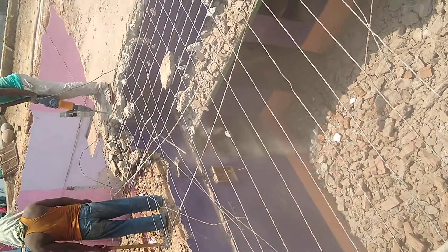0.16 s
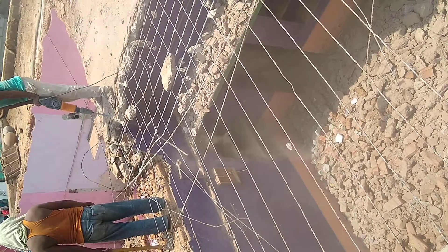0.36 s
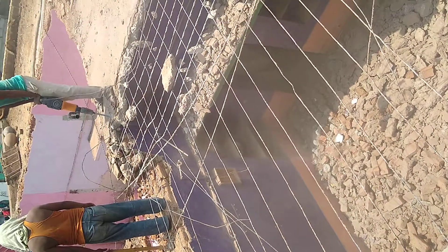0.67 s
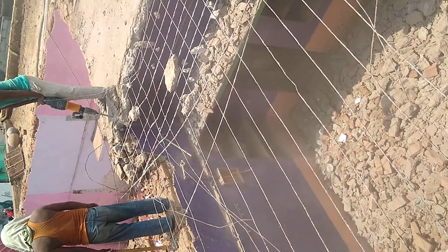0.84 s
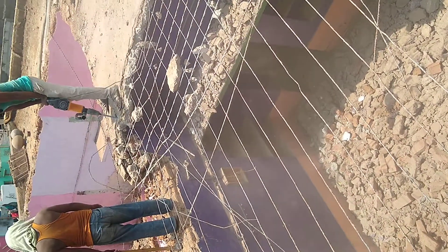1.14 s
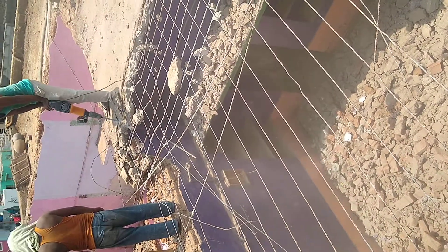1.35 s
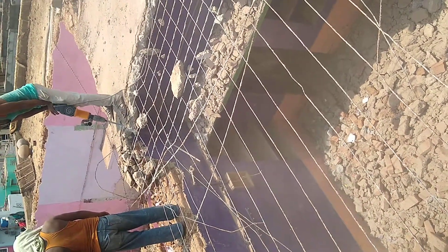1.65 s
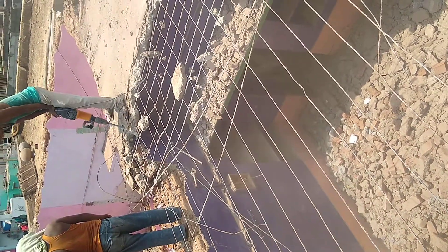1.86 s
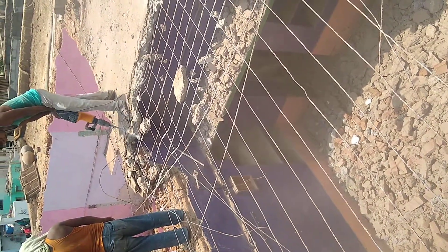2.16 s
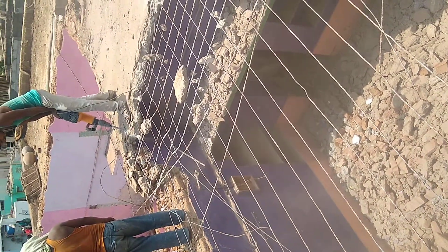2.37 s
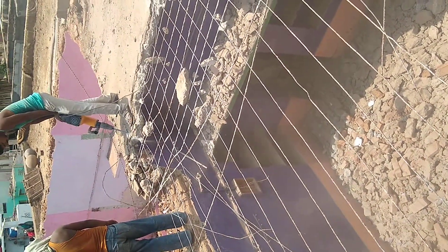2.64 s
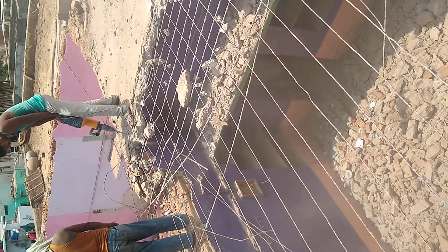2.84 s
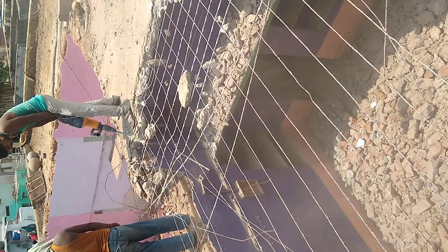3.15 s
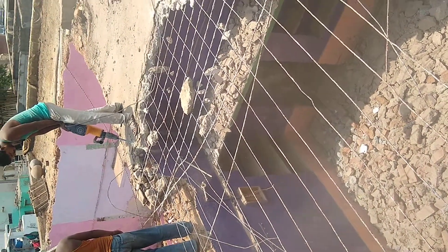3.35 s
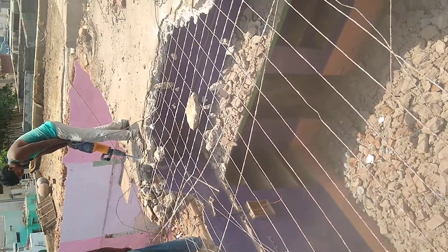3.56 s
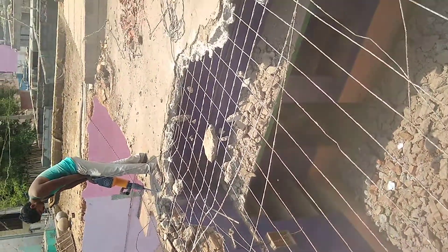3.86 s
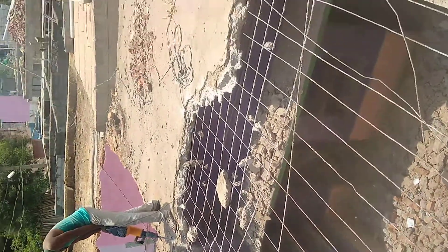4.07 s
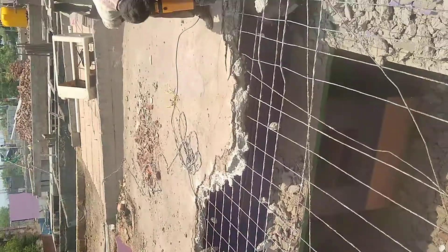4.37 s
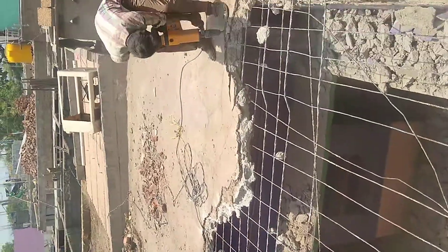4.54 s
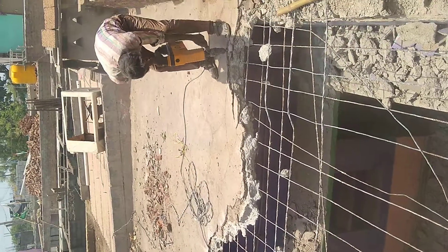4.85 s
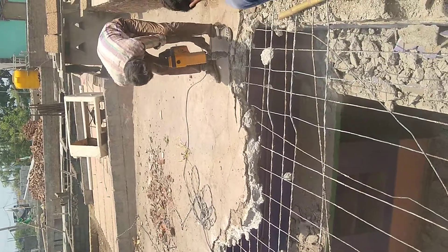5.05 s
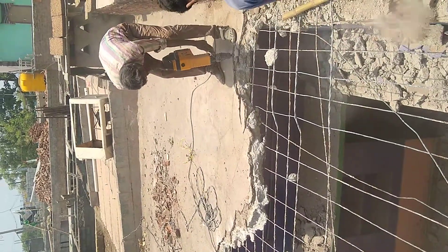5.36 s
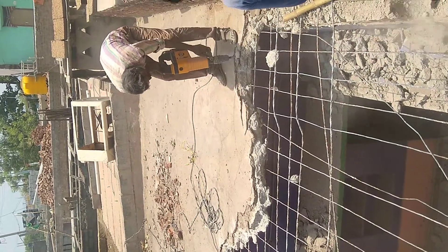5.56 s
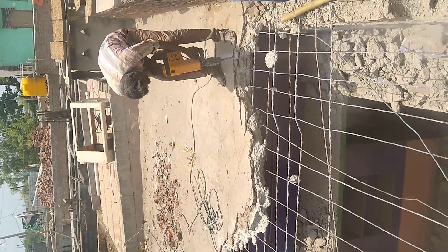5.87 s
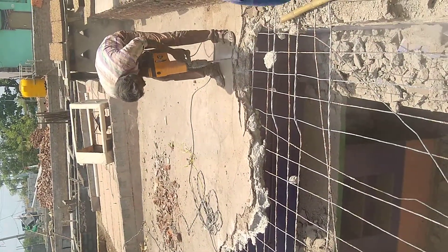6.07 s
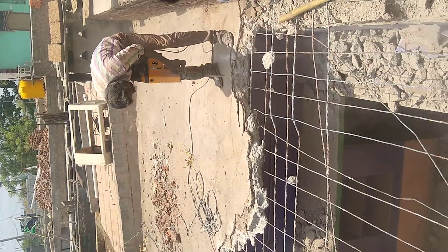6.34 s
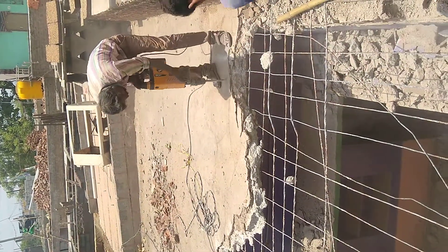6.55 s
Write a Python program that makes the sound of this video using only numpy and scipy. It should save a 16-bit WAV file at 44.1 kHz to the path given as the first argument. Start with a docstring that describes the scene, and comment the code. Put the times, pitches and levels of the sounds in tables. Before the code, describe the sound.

Rapid, heavy jackhammer chatter from two machines on concrete, a short let-up with motor whirr and small clinks, then a single hammer resumes, clanky and uneven.

```python
"""Two electric demolition hammers break a concrete roof slab outdoors, near 32 blows/s, drifting in step and out.
Each blow is an impulse and a decaying burst that excite damped resonances: a crack of steel with a spray
of grit, then a thud and a boom from the slab and the rooms under it. Both let up briefly while the motors,
noise pulsed by armature rotation under a faint whine, whirr on; a lone knock, then one starts again near
the slab's edge, its chisel now biting, now bouncing."""
import sys
import numpy as np
from scipy import signal
from scipy.fft import rfft, irfft, next_fast_len
from scipy.io import wavfile

SR = 44100
rng = np.random.default_rng(int(sys.argv[2]) if len(sys.argv) > 2 else 0)


def write(x):
    x = np.atleast_2d(x).T
    wavfile.write(sys.argv[1], SR, np.round(np.clip(x, -1, 1) * 32767).astype(np.int16))


N = 295911

# transform length (samples) and its frequency grid (Hz)
SIZE = next_fast_len(N + 8192, real=True) // 2 * 2
HZ = np.maximum(np.arange(SIZE // 2 + 1) * SR / SIZE, 1)

GRIT_SNAP = 0.17   # share of the grit's energy that leaves with the first snap
REBOUND_S = .015   # about half a piston stroke


def first_hammer():
    """Forced impact: the piston's rate and the force on the chisel set each blow; alternate blows limp."""
    # piston speed under the changing load: t/s, rate/(blows/s)
    piston_rate = [(0, 32.36), (2.85, 32.36), (3.3, 31.63), (3.7, 31.44), (4.4, 32.9), (4.85, 33.02)]
    # drive as the hammer is leaned on: t/s, boom level/dB, thud level/dB, steel level/dB, grit level/dB
    lean_force = [(0, -24.5, -18.5, -19.5, -36), (0.8, -22.5, -19, -22.5, -36),
                  (1.7, -22, -15.5, -23.5, -45), (2.5, -23, -15, -22.5, -62), (3.0, -26.5, -16, -19.5, -41),
                  (3.6, -21.5, -17, -24, -45), (4.1, -40, -20.5, -34, -42), (4.55, -25.5, -27, -22.5, -32),
                  (4.85, -37.5, -46, -33, -29)]
    run = blows(.0304, piston_rate, lean_force)
    return steady_hammer(run, limp_s=.0004, jitter_s=.00002)


def second_hammer():
    """Forced impact at a second, independent rate, so the two trains beat; returns run and drives."""
    # piston speed under the changing load: t/s, rate/(blows/s)
    piston_rate = [(0, 31.31), (0.3, 31.68), (1.05, 31.9), (1.45, 32.73), (1.85, 32.59), (2.25, 31.65),
                   (2.65, 33.12), (2.9, 33.3), (3.15, 31.58), (3.7, 32.22), (4.4, 31.43)]
    # drive as the hammer is leaned on: t/s, boom level/dB, thud level/dB, steel level/dB, grit level/dB
    lean_force = [(0, -22, -19, -37, -37), (0.8, -35.5, -19.5, -31, -34), (1.7, -27.5, -17, -29, -35),
                  (2.5, -28.5, -17, -23.5, -42), (3.0, -22.5, -17, -24, -44), (3.6, -25, -15, -22, -37.5),
                  (4.0, -22.5, -16.5, -21, -49), (4.375, -23.5, -18.5, -35, -33)]
    run = blows(.0023, piston_rate, lean_force)
    return run, steady_hammer(run, limp_s=0, jitter_s=.00007)


def blows(start_s, rate, force):
    """Phase integration: a blow falls at each whole cycle; gives times, then dB of boom, thud, steel, grit."""
    t = np.arange(int(start_s * SR), N) / SR
    cycles = np.cumsum(at_time(rate, t)[0]) / SR
    times = np.interp(np.arange(int(cycles[-1]) + 1), cycles, t)
    leaned_on = (times >= force[0][0]) & (times <= force[-1][0])
    times = times[leaned_on]
    return np.array([times, *at_time(force, times)])


def steady_hammer(run, limp_s, jitter_s):
    """Superposition: each slightly mistimed blow drives boom, thud, crack and grit, the slab ones delayed."""
    times, boom_db, thud_db, steel_db, grit_db = run
    limp = limp_s * (np.arange(len(times)) % 2 - .5)
    times = times + limp + jitter_s * rng.standard_normal(len(times))
    boom = strike(times + .0035, boom_db, attack_s=.037, tail_s=.042, tail_db=-10, loose=.059, spread_db=0)
    thud = strike(times + .0044, thud_db, attack_s=.003, tail_s=.022, tail_db=-7, loose=.22,
                  spread_db=.5, snap=.5)
    crack = strike(times, steel_db, attack_s=.002, tail_s=.018, tail_db=-16, loose=.1,
                   spread_db=.7, snap=.58)
    grit = strike(times, grit_db, attack_s=.0017, tail_s=.064, tail_db=-10.5, loose=1,
                  spread_db=3.5, snap=GRIT_SNAP)
    return np.array([boom, thud, crack, grit])


def strike(times, level_db, attack_s, tail_s, tail_db, loose, spread_db, snap=0):
    """Convolution: a snap, a sharp burst and a tail of scattered echoes, repeated but for a loose share."""
    t = np.arange(4096) / SR
    fade = np.exp(-t / attack_s) + from_db(tail_db) * np.exp(-t / tail_s)
    echoes = rfft(fade * rng.standard_normal(len(t)), 2 * len(t))
    # flatten most of the chance colour of the echoes
    echoes = irfft(echoes / abs(echoes) ** .8)[:len(t)]
    # a blow of 0 dB has an rms of one over one stroke of the piston
    stroke = SR / 32
    echoes *= np.sqrt(stroke / np.sum(echoes ** 2))
    power = fade ** 2 * stroke / np.sum(fade ** 2)
    hits = np.zeros(N)
    places = np.clip(np.round(times * SR).astype(int), 0, N - 1)
    hits[places] = from_db(level_db + spread_db * rng.standard_normal(len(times)))
    # the loose share crumbles: fresh noise under the same decay of power
    crumble = np.sqrt(abs(signal.oaconvolve(hits ** 2, power)[:N])) * rng.standard_normal(N)
    loose = np.clip(loose, 0, 1)
    burst = np.sqrt(1 - loose) * signal.oaconvolve(hits, echoes)[:N] + np.sqrt(loose) * crumble
    snap = np.clip(snap, 0, 1)
    return np.sqrt(snap * stroke) * hits + np.sqrt(1 - snap) * burst


def steel_rebound(crack):
    """Delayed reflection: the first hammer's steel rattles back about half a stroke after each blow."""
    t = np.arange(N) / SR
    delay_s = np.round(REBOUND_S * SR) / SR
    return from_db(-7.5) * np.interp(t - delay_s, t, crack, left=0)


def slab_knock(times):
    """Near-field impact: the slab under the second chisel comes to be heard directly, ahead of its thud."""
    # knock level rising: t/s, level/dB
    knock_level = [(3.1, -23), (3.9, -24), (4.03, -19), (4.375, -14)]
    times = times[times >= knock_level[0][0]]
    return strike(times + .0005, at_time(knock_level, times)[0], attack_s=.003, tail_s=.01, tail_db=-12,
                  loose=.2, spread_db=.4, snap=.65)


def rattle(times):
    """Repeated impact: the second chisel rings, then again falling into its holder, until concrete grips it."""
    # rattle level dying away: t/s, level/dB
    rattle_level = [(0, -39), (0.5, -38.5), (1.0, -42), (1.5, -46), (2.0, -54)]
    times = times[times <= rattle_level[-1][0]]
    times = np.concatenate([times, times + REBOUND_S])
    return strike(times + .002, at_time(rattle_level, times)[0], attack_s=.002, tail_s=.012, tail_db=-10,
                  loose=.9, spread_db=3, snap=.25)


def gliding_ring(drive):
    """Time-varying resonance: a piece of slab rings under the blows, mostly rising as it works loose."""
    # ring of the piece: t/s, f/Hz, level against the thud/dB
    piece_ring = [(2.8, 1020, -25), (3.05, 1080, -9), (3.3, 1120, -19), (3.85, 1150, -7), (4.0, 1140, -6),
                  (4.35, 1190, -12)]
    width_hz = 35
    hz, db = at_time(piece_ring, np.arange(N) / SR)
    turn = np.exp(2j * np.pi * np.cumsum(hz) / SR)
    keep = np.exp(-np.pi * width_hz / SR)
    # shift the ring down to 0 Hz, smooth it with one pole, shift it back
    envelope = signal.lfilter([np.sqrt(2 * (1 - keep ** 2))], [1, -keep], drive / turn)
    return from_db(db) * np.real(turn * envelope)


def last_hammer():
    """Irregular forcing: the second hammer's uneven blows as it is let up."""
    # single blows, gains before the offsets below: t/s, thud gain/dB, steel gain/dB, grit gain/dB
    last_rows = [(4.392, -5, -17, -31), (4.427, -10, -24, -28), (4.455, -7.5, -26, -26),
                 (4.49, -12, -31, -26), (4.519, -5.5, -22, -25), (4.549, -4, -13, -23),
                 (4.578, -2, -17, -28), (4.607, -9.5, -15, -24), (4.638, -2, -16, -29),
                 (4.67, -7.5, -24, -34)]
    return uneven_hammer(last_rows, boom_db=-17, thud_db=-9.5, steel_db=-7, grit_db=-3.5)


def edge_hammer():
    """Irregular forcing at a free edge: a lone knock, then the restart; a bite thuds, a bounce clanks."""
    # single blows, gains before the offsets below: t/s, thud gain/dB, steel gain/dB, grit gain/dB
    edge_rows = [(5.141, -17, -15, -38), (5.647, -14, -29, -32), (5.682, -18, -21, -30),
                 (5.713, -11.5, -19, -30), (5.741, -12.5, -13.5, -22), (5.772, -8, -15, -22.5),
                 (5.803, -17, -19, -24), (5.835, -10.5, -14, -23), (5.867, -10, -15, -27),
                 (5.898, -10.5, -16, -24), (5.931, -10, -11.5, -25), (5.961, -11.5, -17, -24.5),
                 (5.995, -9, -12, -25), (6.029, -6.5, -21, -26), (6.056, -12, -13.5, -22),
                 (6.091, -7, -26, -32), (6.121, -7, -23, -23), (6.152, -9.5, -16, -26),
                 (6.188, -8.5, -26, -26.5), (6.218, -6.5, -12.5, -25), (6.248, -14, -13.5, -30),
                 (6.284, -7, -15, -30), (6.311, -5, -18, -25.5), (6.342, -11, -11.5, -27),
                 (6.379, -6.5, -20, -26), (6.407, -15, -18, -27), (6.443, -9, -36, -29),
                 (6.467, -18, -19, -26), (6.506, -8, -23, -29), (6.535, -9.5, -16, -25.5),
                 (6.57, -9.5, -17, -27), (6.6, -9, -14.5, -25), (6.632, -6.5, -17, -25),
                 (6.664, -11.5, -15, -24), (6.695, -9, -22, -28)]
    return uneven_hammer(edge_rows, boom_db=-13, thud_db=-9.5, steel_db=-6, grit_db=-1)


def uneven_hammer(rows, boom_db, thud_db, steel_db, grit_db):
    """Superposition of single blows, each with its own gains; the boom's gain follows the thud's."""
    times, thud, steel, grit = np.transpose(rows)
    # the thud comes back from the floor below
    thud_times = np.concatenate([times, times + .014])
    thuds = np.concatenate([thud, thud - 12])
    boom_drive = strike(times + .002, thud + boom_db, attack_s=.04, tail_s=.065, tail_db=14,
                        loose=.3, spread_db=0)
    thud_drive = strike(thud_times, thuds + thud_db, attack_s=.004, tail_s=.02, tail_db=-10,
                        loose=.55, spread_db=0, snap=.24)
    crack_drive = strike(times, steel + steel_db, attack_s=.003, tail_s=.012, tail_db=-16,
                         loose=.4, spread_db=0, snap=.2)
    grit_drive = strike(times, grit + grit_db, attack_s=.0022, tail_s=.049, tail_db=-7,
                        loose=.94, spread_db=1, snap=GRIT_SNAP)
    return np.array([boom_drive, thud_drive, crack_drive, grit_drive])


def idle_chisel():
    """Light impact: the idle chisel clinks on the concrete, and one dull bump follows the lone knock."""
    # clinks, gains before the offset below: t/s, gain/dB
    clink_rows = [(4.7626, -12), (4.7935, -14), (4.8032, -11), (4.808, -12), (4.8222, -9), (4.869, -9),
                  (5.0382, -7), (5.163, -9.5), (5.612, -11)]
    times, db = np.transpose(clink_rows)
    clinks = strike(times, db - 14.5, attack_s=.0015, tail_s=.021, tail_db=0, loose=.59, spread_db=1, snap=.23)
    bump = strike(np.array([5.19]), -30, attack_s=.06, tail_s=.11, tail_db=0, loose=.32, spread_db=1)
    return clinks, bump


def ring_slab(boom, first_thud, second_thud, knock, crack, grit, rattling, ports):
    """Modal resonance: slab, steel and chisels each colour their drive, heard along one path."""
    # boom of slab and rooms: f/Hz, width/Hz, relative level/dB
    boom_modes = [(65, 6.4, -20), (99, 11, -12), (129, 17, -4.5), (161.6, 71, -6), (205, 86, -6),
                  (256, 14, 1.5), (306, 205, -5.5), (361, 15, -6), (404, 125, -3.5), (488, 32, 1)]
    # slab under each hammer: f/Hz, width/Hz, relative level/dB
    first_modes = [(412, 70, -9), (630, 80, 0), (735, 100, -2.5), (924, 86, 6.5), (1000, 42, -12),
                   (1192, 58, 3), (1320, 36, 0), (1550, 180, -7.5), (1930, 94, -4), (1080, 1240, -3.5)]
    second_modes = [(479, 45, -7), (628, 85, -3), (702, 126, 2), (891, 40, 5), (1140, 65, -15),
                    (1296, 104, 0.5), (1460, 84, -2), (1770, 130, -14), (1160, 1300, -7.5)]
    # slab right under the second chisel: f/Hz, width/Hz, relative level/dB
    knock_modes = [(252, 21, 1), (688, 88, 5.5), (919, 52, 7), (1220, 175, -1), (1470, 160, -23),
                   (1000, 1200, -8.5)]
    # steel cracking: f/Hz, width/Hz, relative level/dB
    crack_modes = [(1893, 80, -4), (2620, 230, -1), (2970, 410, -2), (3335, 430, 0), (3496, 37, 7),
                   (3885, 290, 0.5)]
    # chisels, and the highest ring of the steel: f/Hz, width/Hz, relative level/dB
    chisel_modes = [(5330, 1000, -3), (5900, 260, 5.5), (7730, 380, 6), (8850, 2800, -13), (10330, 120, 2),
                    (10600, 2100, -11), (13400, 200, 2)]
    top_modes = [(14900, 45, 9)]
    # second chisel rattling before it bites: f/Hz, width/Hz, relative level/dB
    rattle_modes = [(5500, 250, 1), (7940, 220, -1), (10700, 200, -8)]
    layers = [(boom, boom_modes), (first_thud, first_modes), (second_thud, second_modes), (knock, knock_modes),
              (crack, crack_modes), (grit, [*chisel_modes, *top_modes]), (rattling, rattle_modes)]
    return sum(colour(drive, resonances(modes), ports) for drive, modes in layers)


def ring_edge(boom, thud, grit, loose_grit, ports):
    """Modal resonance: the slab's free edge and the chisel there, heard along a path of their own."""
    # boom and thud of the free edge: f/Hz, width/Hz, relative level/dB
    boom_modes = [(126.6, 23, 1.5), (167, 42, 3.5), (251, 44, 2.5), (337, 16.3, 1), (494, 400, -13.5)]
    thud_modes = [(610, 56, 5.5), (690, 140, 5), (810, 220, 6.5), (960, 220, 3.5), (1300, 150, -2),
                  (1880, 160, 0), (800, 700, -2)]
    # chisel ringing at the edge: f/Hz, width/Hz, relative level/dB
    chisel_modes = [(5370, 170, 9), (5800, 460, 5.5), (7770, 200, 14.5), (7800, 870, 6), (9500, 340, -8),
                    (10410, 230, 7), (11100, 400, -0.5), (12200, 2100, -7), (13600, 340, 6), (15000, 70, 7)]
    # chisel scraping loosely as the second hammer is let up: f/Hz, width/Hz, relative level/dB
    loose_modes = [(5640, 550, 3), (7700, 510, 8), (9300, 710, 1), (12500, 3000, -10)]
    layers = [(boom, boom_modes), (thud, thud_modes), (grit, chisel_modes), (loose_grit, loose_modes)]
    return sum(colour(drive, resonances(modes), ports) for drive, modes in layers)


def motors(ports):
    """Amplitude modulation: fan air and gear chatter pulse with each armature turn, under a faint whine."""
    # motor and fan noise: t/s, level/dB
    motor_level = [(0, -18.5), (4.3, -21), (4.8, -21), (5.0, -24), (5.2, -20.5), (5.4, -24), (5.6, -22),
                   (6.7, -20.5)]
    # its spectrum: f/Hz, relative level per Hz/dB
    motor_spectrum = [(60, -6), (130, -10.5), (430, -6.5), (750, 0.5), (1100, -2), (1600, -1.5),
                      (2250, 2.5), (2900, 1), (3800, 6), (4400, -8.5), (5200, -8), (6300, -20.5),
                      (9000, -20.5), (15500, -21.5)]
    # armature speed as the load comes and goes: t/s, speed/(turns/s)
    armature_speed = [(0, 300), (4.6, 326), (4.8, 287), (5.05, 290), (5.2, 290), (5.3, 325), (5.42, 300),
                      (5.65, 270), (5.85, 260), (6.7, 185)]
    # whine tones: multiple of the armature speed, level/dB
    whine_tones = [(1, -40.5), (2, -56)]
    t = np.arange(N) / SR
    turns = np.cumsum(at_time(armature_speed, t)[0] * (1 + .0048 * waver(20))) / SR
    pulse = 1 + .099 * np.sin(2 * np.pi * turns)
    air = rng.standard_normal(N) * pulse * from_db(at_time(motor_level, t)[0] + 1.7 * waver(90))
    whine = sum(from_db(db + 2 * waver(22.16)) * np.sin(2 * np.pi * multiple * turns)
                for multiple, db in whine_tones)
    heard_air = colour(air, from_db(at_hz(motor_spectrum)), ports)
    heard_whine = irfft(rfft(whine, SIZE) * ports)[:, :N]
    return heard_air + heard_whine


def waver(per_s):
    """Random modulation: unit normal values about zero, per_s each second, joined by straight lines."""
    knots = rng.standard_normal(int(N / SR * per_s) + 2)
    return np.interp(np.arange(N) / SR * per_s, np.arange(len(knots)), knots)


def microphones():
    """Interaural-type phase lag: treble reaches the left port later; each port adds scatter from the rubble."""
    # left against right: f/Hz, level difference/dB
    balance = [(60, 1.0), (110, 0.5), (200, -1.5), (380, -3.0), (700, 0.0), (1290, 1.5), (2380, -0.5),
               (4400, -1.0), (8120, 7.0), (15000, 2.0)]
    # left behind right: f/Hz, phase lag/rad
    left_lag = [(1500, 0), (2270, 3.14), (2760, 5.2), (4500, 9.4), (5200, 11.3), (15000, 11.3)]
    # scattered sound: f/Hz, relative level/dB
    scatter_level = [(60, 1), (250, -6), (700, -10), (1500, -11), (2250, -8), (3500, -9), (6000, -6),
                     (15000, 3)]
    side = np.array([[1], [-1]]) / 2
    direct = np.exp(-1j * side * at_hz(left_lag))
    t = np.arange(4096) / SR
    scatter = rfft(rng.standard_normal((2, len(t))) * np.exp(-t / .012), SIZE)
    scatter /= np.sqrt(np.mean(abs(scatter) ** 2))
    # remove the part common to both ports, mainly below 1800 Hz
    scatter -= scatter.mean(axis=0) / (1 + (HZ / 1800) ** 4)
    return from_db(side * at_hz(balance)) * (direct + from_db(at_hz(scatter_level)) * scatter)


def colour(x, gain, ports):
    """Minimum-phase filtering at both ports; white noise keeps its level in the middle."""
    # folding the cepstrum makes the filter causal
    cepstrum = irfft(np.log(gain + 1e-6))
    cepstrum[1:SIZE // 2] *= 2
    cepstrum[SIZE // 2 + 1:] = 0
    response = np.exp(rfft(cepstrum)) * ports
    response /= np.sqrt(np.mean(abs(response.mean(axis=0)) ** 2))
    return irfft(rfft(x, SIZE) * response)[:, :N]


def resonances(modes, skirt=1.676):
    """Power summation of damped resonances side by side, as a gain."""
    grid = HZ[::8]
    power = sum(from_db(db) ** 2 / (1 + ((grid - hz * hz / grid) / width) ** 2) ** skirt
                for hz, width, db in modes)
    return np.interp(HZ, grid, np.sqrt(power))


def from_db(db):
    """Decibel law: amplitude ratio of a level."""
    return 10 ** (np.asarray(db) / 20)


def at_time(rows, t):
    """Linear interpolation: the columns of a curve at the times t."""
    s, *columns = np.transpose(rows)
    return np.array([np.interp(t, s, column) for column in columns])


def at_hz(points):
    """Interpolation over log frequency: a spectrum table on the frequency grid."""
    hz, value = np.transpose(points)
    return np.interp(np.log(HZ), np.log(hz), value)


def scene():
    """Superposition: the hammers drive slab, edge and steel; the motors run throughout."""
    slab_ports, edge_ports, motor_ports = microphones(), microphones(), microphones()
    first = first_hammer()
    second_run, second = second_hammer()
    second_times = second_run[0]
    boom, _, crack, grit = first + second
    last_boom, last_thud, last_crack, last_grit = last_hammer()
    edge_boom, edge_thud, edge_crack, edge_grit = edge_hammer()
    clinks, bump = idle_chisel()
    knock = slab_knock(second_times) + last_thud
    steel = crack + steel_rebound(first[2]) + last_crack + edge_crack + clinks
    slab = ring_slab(boom, first[1], second[1], knock, steel, grit, rattle(second_times), slab_ports)
    edge = ring_edge(edge_boom + last_boom + bump, edge_thud, edge_grit, last_grit, edge_ports)
    return slab + gliding_ring(second[1]) + edge + motors(motor_ports)


def record(dry):
    """Band limiting and soft saturation: the deep bass is cut, peaks are rounded, the top is cut."""
    thin = signal.sosfilt(signal.butter(8, 60, "high", fs=SR, output="sos"), dry)
    rounded = 0.9 * np.tanh(thin / 1.42)
    return signal.sosfilt(signal.ellip(10, .1, 90, 15500, fs=SR, output="sos"), rounded)


dry = scene()
out = record(dry)
write(out)
```